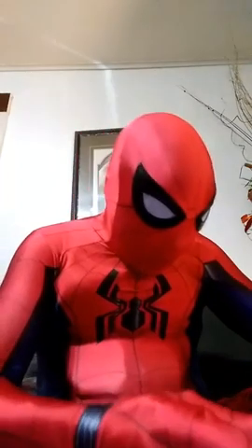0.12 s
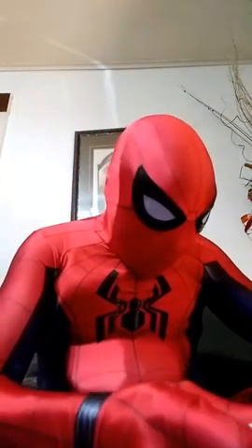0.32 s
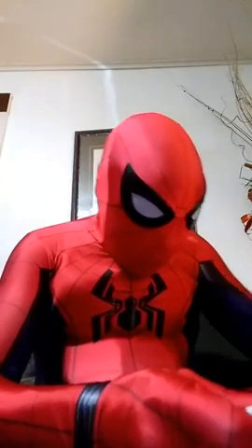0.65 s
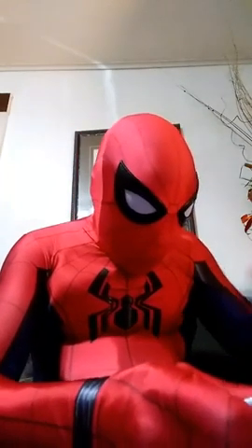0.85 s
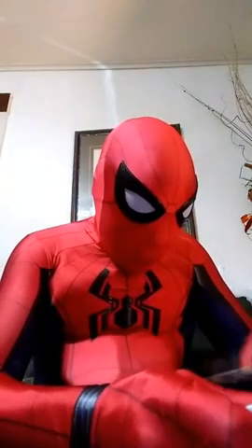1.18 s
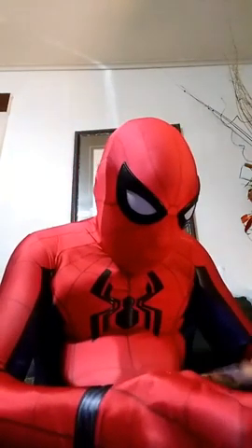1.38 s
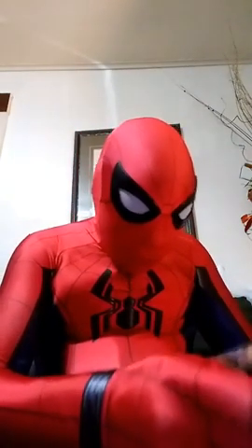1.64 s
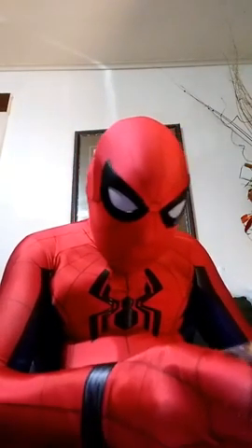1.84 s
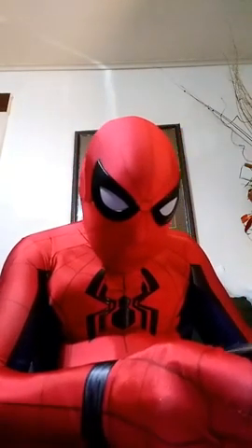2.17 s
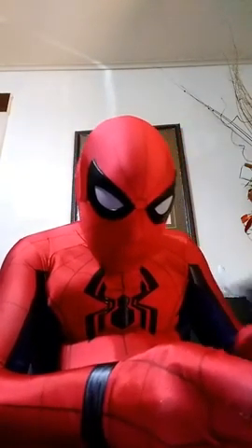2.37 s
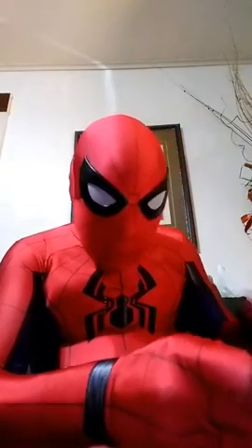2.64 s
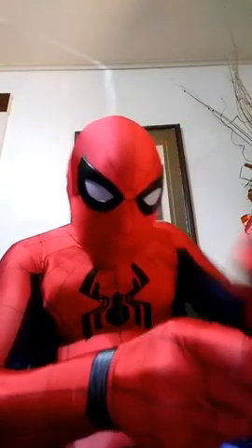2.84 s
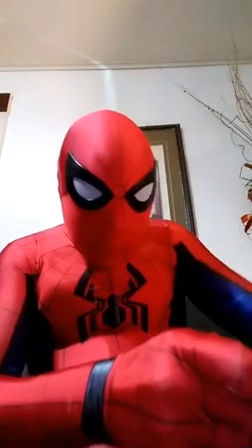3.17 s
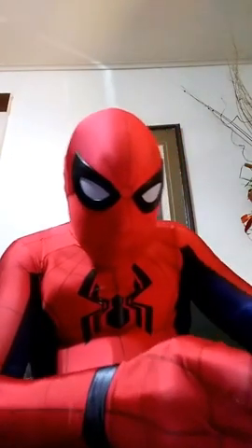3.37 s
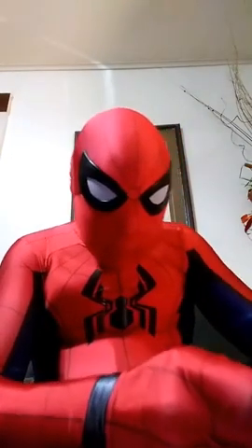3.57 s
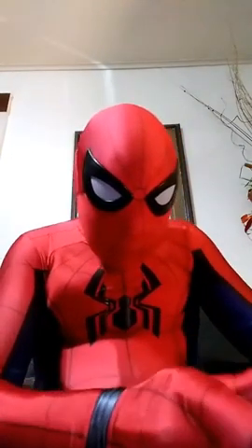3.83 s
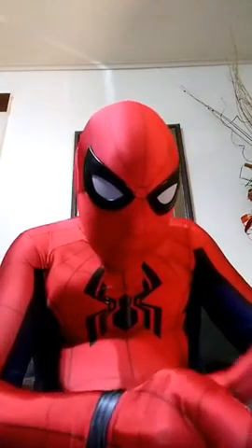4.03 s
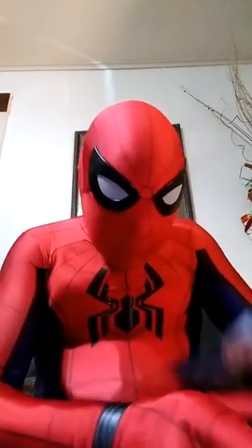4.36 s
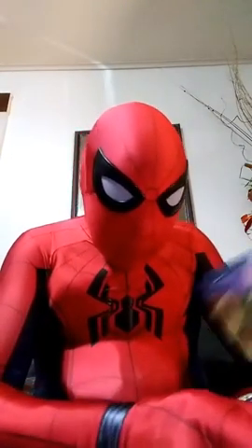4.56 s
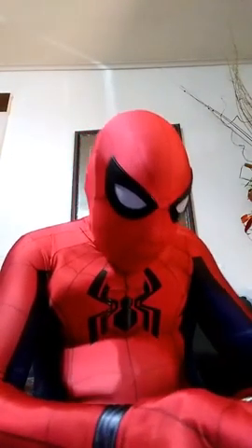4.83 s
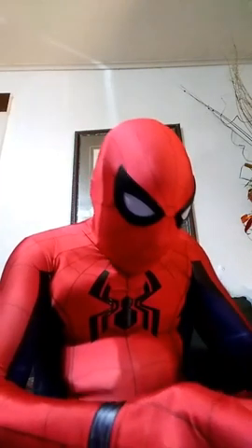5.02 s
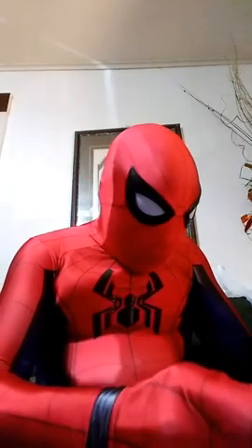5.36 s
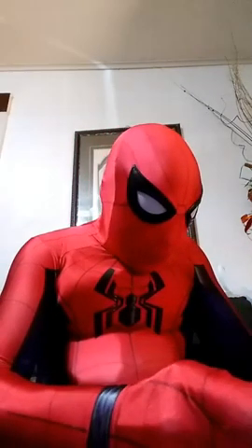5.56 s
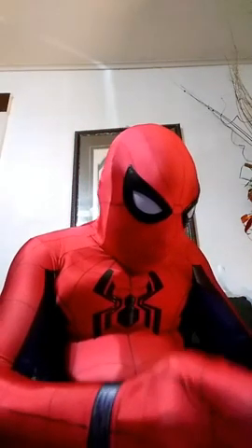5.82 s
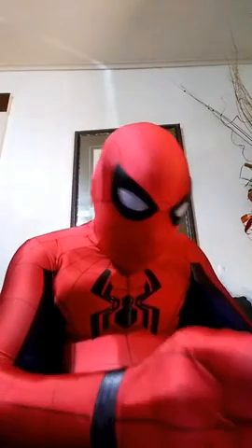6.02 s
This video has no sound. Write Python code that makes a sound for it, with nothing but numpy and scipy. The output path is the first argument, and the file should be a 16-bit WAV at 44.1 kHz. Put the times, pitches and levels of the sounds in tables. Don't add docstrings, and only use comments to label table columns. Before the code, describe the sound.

A quiet room, heard through a small close microphone whose faint hiss nearly vanishes between movements. A small paper jolt and snap come at once, then from 0.1 to 1.0 s pages scrape and crackle, with crisp snaps near 0.4 s and a stronger, duller papery snap at 0.85 s. Soft rubs and a hollow tap follow until 1.3 s. After a lull, light rustles at 1.6 and 1.9 s lead to a scraping turn with snaps and ticks from 2.0 to 2.4 s. Sparse small flicks continue to 3.2 s. A sharp crack at 3.3 s opens the busiest turn: grainy sliding, a hard snap at 4.08 s, a finger knock at 4.28 s, and crackles around 4.35 to 4.6 s, fading by 4.8 s. Tiny ticks dot the hush. From 5.6 to 6.0 s a soft, bright, airy page slide passes, with a barely audible very high whine, then a last faint rub at 6.1 s.

```python
import sys
import numpy as np
from scipy import signal
from scipy.fft import rfft, irfft, next_fast_len
from scipy.io import wavfile
from scipy.ndimage import uniform_filter1d

SR = 44100
rng = np.random.default_rng(int(sys.argv[2]) if len(sys.argv) > 2 else 0)


def gain_from_decibels(decibels):
    exponent = np.asarray(decibels, float) / 20
    return 10 ** exponent


def int16_out(signal):
    q = np.round(np.clip(np.atleast_2d(signal).T, -1, 1) * 32767)
    wavfile.write(sys.argv[1], SR, q.astype(np.int16))


N = 272449

# start in seconds, length in seconds, scrape in dB,
# brightness in dB, weight on the book in dB.
DRAGS = [(0.103, 0.091, -52.5, 0.5, 0), (0.253, 0.15, -46, 1, -7), (0.4, .07, -51, 1, -8),
         (0.47, 0.2, -46.5, -8, -7.5), (0.689, 0.052, -36.5, -9, -4), (0.905, 0.14, -53.5, -12, 3),
         (1.079, 0.17, -61, 3, 4), (1.591, 0.083, -51, -3.5, -13), (1.668, 0.082, -55, -5.5, -1),
         (1.895, 0.083, -58, -2.5, -5), (2.024, 0.25, -57.5, -1, 2.5), (2.092, 0.136, -42, -9.5, 0),
         (2.068, .03, -50, -3, -2), (2.231, .14, -41.5, -13.5, 1), (2.554, 0.082, -51, -13, -5),
         (4.063, 0.02, -32, -5, -6.5), (2.887, 0.064, -53, -9, -2), (3.279, 0.015, -57, -16, 2),
         (3.298, .01, -52, -8, -3), (3.402, 0.22, -51, 0, -2), (3.63, .31, -47, -3, -2),
         (3.938, 0.22, -42, -4, -5), (4.155, 0.22, -45.5, -5, -0.5), (4.346, 0.176, -42.5, -1, -9),
         (4.522, 0.056, -49, -4, -2), (4.578, 0.16, -45.5, -2, -7), (5.903, 0.1, -50, -8, -2),
         (5.573, .125, -57.5, 6.5, -4.5)]
# start in seconds, length in seconds, scrape in dB,
# brightness in dB, weight on the book in dB.
SWISHES = [(0.26, 0.14, -48.5, -2, -14), (0.482, 0.23, -41.5, -7, -28), (0.826, 0.06, -31, -40, -1),
           (1.862, 0.061, -52, -5.5, -1), (2.125, 0.1, -36.5, -14, -35), (3.022, 0.046, -55.5, -4.5, -2),
           (2.745, 0.039, -57.5, -5, -4), (3.158, 0.039, -55.5, -5, 6), (3.392, .15, -41, -2, -7),
           (3.759, 0.15, -47, -2.5, -8), (4.028, 0.1, -36.5, -5, -8), (4.173, 0.051, -43.5, -2, -12),
           (4.47, 0.078, -42.5, -9, -14), (4.913, 0.082, -53, -17, -2.5), (5.621, 0.036, -50, 3, 3),
           (5.634, 0.27, -46.5, 4.5, -3), (5.741, 0.2, -48, 6.5, 0), (6.118, 0.09, -48.5, -5, -1.5),
           (0.95, 0.092, -59, 5.5, 6), (3.591, 0.07, -51, -2, -1.5)]
# start in seconds, length in seconds, scrape in dB,
# brightness in dB, weight on the book in dB.
JOLTS = [(0.029, 0.05, -45, -1.5, -3), (0.202, 0.13, -51, -8, -6.5), (0.742, 0.093, -41.5, -10, -1),
         (0.824, 0.033, -33.5, -26, -3), (0.865, 0.11, -35, -33, 3.5), (1.885, 0.09, -47, -16, 9),
         (1.091, 0.2, -48, -32, -2), (1.22, 0.074, -55, -23, 10), (1.604, 0.074, -52.5, 3, 6),
         (2.36, 0.083, -47, -6, 1), (2.562, 0.015, -46, -10, -15), (3.3074, .03, -24.5, -2, -7.5),
         (3.315, 0.09, -36.5, -4, -7.5), (4.339, 0.14, -38.5, -2, -3.5), (4.672, 0.09, -50, -12, 7),
         (4.585, .03, -44, -1, -11), (4.72, 0.085, -47.5, -1.5, -2)]
# start in seconds, length in seconds, rumble in dB.
BUMPS = [(0.24, 0.21, -56), (0.624, 0.087, -43.5), (0.7, .11, -45), (0.83, 0.064, -49), (0.911, .1, -43),
         (1.06, 0.16, -48.5), (1.218, 0.084, -49.5), (1.606, 0.078, -50), (1.871, 0.1, -44),
         (2.09, 0.31, -51.5), (2.26, 0.15, -46.5), (2.536, 0.088, -51), (3.306, 0.032, -34.5),
         (3.376, 0.083, -51), (3.656, 0.062, -47.5), (4.066, 0.14, -46.5), (4.12, 0.15, -45.5),
         (4.263, 0.051, -40.5), (4.676, 0.13, -49), (5.643, 0.17, -55.5), (6.132, 0.043, -54)]
# centre in Hz, width in Hz, level in dB.
LOW_RINGS = [(1212, 510, -7), (1313, 670, 0), (1610, 350, -1), (1976, 570, 3)]
# centre in Hz, width in Hz, level in dB.
HIGH_RINGS = [(2810, 970, 3), (3290, 680, -0.5), (3970, 820, -0.5), (4336, 1100, -7)]
# centre in Hz, width in Hz, level in dB.
HOLLOW = [(620, 145, 1.5), (485, 410, -4), (820, 680, -11.5)]
# centre in Hz, width in Hz, lift in dB.
CAVITIES = [(361, 30, 0), (883, 25, -0.5), (1092, 25, -2.5), (1590, 27, -5.5), (1955, 34, -6.5),
            (2150, 34, -6), (3046, 42, -5.5)]
# frequency in Hz, level in dB.
SURFACE_SPECTRUM = [(800, -20.5), (3000, -11), (5000, 1), (7000, -3), (10000, -10.5), (14000, -21.5)]
# frequency in Hz, level in dB.
RUMBLE_SPECTRUM = [(25, -34), (55, 3), (120, 0), (300, -2.5), (450, -5.5), (900, -24.5), (2000, -54)]
# opening in seconds, closing in seconds.
GATE_SPANS = [(0.026, 0.083), (0.103, 1.049), (1.077, 1.292), (1.597, 1.756), (1.862, 1.987),
              (2.022, 2.428), (2.553, 2.639), (2.752, 2.779), (2.89, 2.95), (3.024, 3.059), (3.163, 3.194),
              (3.279, 4.791), (4.916, 4.987), (5.573, 6.018), (6.128, 6.2)]
# start in seconds, length in seconds,
# first pitch in Hz, last pitch in Hz, level in dB.
ARCHES = [(0.25, 0.19, 3100, 3120, -48.5), (0.53, 0.12, 3080, 2930, -42.5),
          (1.596, 0.062, 3080, 2670, -47.5), (2.17, 0.06, 4500, 4500, -49),
          (2.238, 0.17, 4520, 4330, -48.5), (2.3, .07, 3100, 2800, -44), (2.165, .05, 1710, 1570, -41),
          (0.466, 0.057, 3250, 2900, -40.5), (.495, .1, 2050, 1860, -45), (.285, 0.025, 3300, 3300, -46),
          (4.94, 0.043, 1210, 1070, -56.5), (2.56, .05, 1900, 1850, -50), (2.86, .09, 1950, 1950, -62),
          (4.193, 0.031, 2960, 2680, -44), (4.396, 0.026, 3250, 3000, -40.5),
          (4.58, 0.032, 1650, 1480, -45), (4.062, 0.027, 2080, 2150, -32.5),
          (4.09, 0.037, 4100, 3760, -40.5), (2.09, .07, 3040, 3070, -43.5),
          (1.095, 0.065, 1150, 1190, -49.5), (1.086, .14, 3860, 4270, -60.5),
          (3.298, 0.82, 2170, 1940, -59.5), (0.5, 0.06, 1500, 1600, -46), (5.592, 0.048, 5400, 5550, -51)]
# start in seconds, length in seconds,
# first pitch in Hz, last pitch in Hz, level in dB.
BILLOWS = [(0.824, 0.06, 1560, 1166, -26), (5.662, 0.27, 4400, 4400, -45), (0.428, 0.045, 3300, 2900, -40),
           (0.43, .08, 4700, 3600, -42), (2.241, 0.077, 3560, 3070, -39.5),
           (0.832, 0.039, 3000, 2700, -41.5), (0.69, 0.054, 1600, 1260, -35.5),
           (0.69, .05, 4100, 2800, -40.5), (4.035, .1, 5400, 5000, -42.5), (5.76, .14, 6300, 6700, -50),
           (0.845, 0.05, 620, 560, -31), (.86, .03, 350, 320, -36), (4.035, .03, 1900, 2000, -39),
           (0.68, 0.067, 1040, 1060, -43)]
# start in seconds, length in seconds, first pitch in Hz,
# last pitch in Hz, level in dB.
STIRS = [
    (5.44, 0.25, 4000, 4800, -71.5),
    (6.027, 0.083, 3500, 3500, -65),
]
# start in seconds, peak in dB, centre in Hz, 60 dB decay in seconds.
SNAPS = [(0.031, -32, 1700, 0.037), (0.2573, -25, 3220, 0.031), (0.389, -19.5, 3020, 0.05),
         (0.432, -17, 3300, 0.06), (0.4887, -22, 3050, 0.03), (0.692, -36, 1830, 0.03),
         (1.9425, -56, 1660, 0.03), (2.106, -24, 1920, 0.08), (2.1294, -38, 1900, 0.03),
         (2.285, -35, 3340, 0.03), (3.171, -30, 2170, 0.032), (3.309, -12, 3300, 0.02),
         (3.3128, -9, 2100, 0.025), (3.3212, -10.5, 2170, 0.047), (3.9914, -19.5, 1610, 0.012),
         (4.0755, -10, 2090, 0.011), (4.082, -6, 2200, 0.022), (4.342, -23, 2440, 0.03),
         (4.358, -13.5, 1860, 0.061), (4.403, -17, 3140, 0.096), (4.515, -22, 1710, 0.053),
         (4.5848, -25.5, 1700, 0.027), (0.8423, -8.5, 1470, 0.026), (0.853, -6, 1490, 0.017),
         (2.2405, -24, 1700, .04), (2.347, -25, 1600, .03), (2.318, -22, 1500, .04),
         (0.5035, -23, 1900, .04), (3.411, -26, 2150, .04)]
# start in seconds, peak in dB, centre in Hz.
TICKS = [(0.2064, -27, 5200), (0.2066, -33, 2500), (0.4344, -36, 2900), (0.6178, -29, 5000),
         (1.227, -44, 5900), (2.1306, -21, 2800), (2.2214, -47, 3000), (2.358, -27.5, 2600),
         (1.9424, -37, 3400), (2.5644, -25, 4200), (3.3082, -13, 3400), (3.3084, -23, 6000),
         (3.3225, -17.5, 5800), (3.9535, -27, 5500), (3.9535, -30, 2100), (4.3424, -21, 3000),
         (4.3426, -27, 6500), (4.143, -32, 5500), (3.4547, -33, 2200), (3.497, -29, 2800),
         (3.633, -35, 5800), (4.0464, -28, 2400), (4.702, -36, 3200), (4.735, -38, 3100),
         (4.518, -33, 4000), (2.2855, -25, 3000), (5.423, -57, 3000)]
# start in seconds, peak in dB, pitch in Hz, 60 dB decay in seconds.
TAPS = [(0.107, -45, 603, 0.039), (0.649, -30, 105, 0.037), (0.691, -26, 684, 0.051),
        (0.779, -36, 650, 0.05), (1.105, -34.5, 524, 0.059), (1.22, -41, 684, 0.049),
        (1.889, -38, 592, 0.044), (1.901, -52, 600, 0.039), (2.104, -38, 640, 0.11),
        (2.129, -28, 630, 0.02), (2.564, -38, 92, 0.024), (2.764, -45, 616, 0.048),
        (3.134, -50.5, 517, 0.2), (2.57, -48, 560, .15), (3.172, -46, 625, 0.042),
        (3.31, -27.5, 670, 0.067), (4.163, -40, 192, 0.038), (4.274, -31, 121, 0.089),
        (4.292, -37, 616, 0.06), (4.672, -50, 600, 0.037), (4.931, -52, 562, 0.11)]
# centre in seconds, peak in dB, pitch in Hz, length in seconds.
KNOCKS = [(4.2785, -19, 611, .015), (4.2885, -29, 620, .012), (4.169, -32, 190, 0.0244),
          (4.279, -30, 385, .02), (3.315, -31, 150, .02), (3.313, -30, 230, .012), (4.222, -35, 2850, .006),
          (4.208, -39, 2600, 0.0065), (5.283, -52, 620, .012), (5.131, -54, 600, 0.0116),
          (5.024, -57, 560, .01)]
# time in seconds, leak in dB.
LEAK_LEVELS = [(0.0, -75), (0.017, -63), (1.29, -65), (1.305, -75), (1.48, -70), (1.5, -64.5), (1.585, -61),
               (1.81, -66), (2.44, -65.5), (2.54, -68), (2.65, -65.5), (2.875, -60.5), (2.975, -65),
               (3.25, -71), (4.9, -66), (5.4, -72), (5.565, -67), (6.03, -62)]
# start in seconds, peak in dB, length in seconds.
FLICKS = [(1.518, -58, 0.0076), (1.529, -46, 0.0088), (1.539, -43, 0.012), (1.555, -53, 0.0092),
          (1.841, -47, 0.005), (2.005, -45, 0.013), (2.482, -53, 0.0056), (2.498, -65, 0.0043),
          (2.669, -63, 0.0058), (2.69, -46, 0.0033), (2.713, -44, 0.0058), (2.729, -46, 0.016),
          (2.8, -51, 0.0046), (2.815, -42.5, 0.0079), (2.876, -46, 0.006), (3.09, -55, 0.007),
          (3.116, -56, 0.0042), (3.142, -48, .025), (2.958, -42, .01), (2.865, -45, .02),
          (4.832, -47, 0.0075), (5.019, -46, 0.011), (5.129, -41.5, 0.0072), (5.133, -51, 0.025),
          (5.241, -45.5, 0.003), (5.265, -49.5, 0.0075), (5.281, -40.5, 0.0076), (5.312, -39, 0.011),
          (6.062, -60, 0.01), (6.077, -53, 0.013)]
# frequency in Hz, level in dB.
LEAK_SPECTRUM = [(25, -29), (55, 0), (170, -2), (400, -9), (620, -5.5), (950, -14.5), (2080, -9.5),
                 (2800, -12.5), (7400, -24), (14000, -29.5)]
# frequency in Hz, level in dB.
MIC_SPECTRUM = [(500, -10), (4000, -0.5), (14000, -3)]
# start in seconds, pitch in Hz, level in dB.
WHINE = (5.605, 13310, -73)

EDGE_S, DRAG_SAG_DB = 0.006, 2.5
SWISH_ENDS_DB = -18
JOLT_RISE_S, JOLT_FALL_DB, JOLT_BEND = 0.0035, -20, 1.3
STIFF_DB, STIFF_PER_BRIGHT = 0.5, 0.49
SUPPORT_DB, SUPPORT_PER_WEIGHT = -4.5, 0.62
ARCH_WIDTH, BILLOW_WIDTH, STIR_WIDTH = 0.1, 0.23, 0.9
TICK_TOP = 1.9
MIC_HISS_DB = -64
LOW_CUT_HZ, HIGH_CUT_HZ = 33, 14300


def strokes():
    low, high, hollow, hiss, support = efforts()
    gate = open_gate()
    sheet = low * rings(LOW_RINGS, patchy_db=2.5) + high * rings(HIGH_RINGS, patchy_db=2.0)
    surface = coloured(rub(), SURFACE_SPECTRUM) + gain_from_decibels(-9) * ring(6360, 750, patchy_db=-3.0)
    rumble = evened(coloured(rub(), RUMBLE_SPECTRUM) * gain_from_decibels(1.5 * lumps(0.0049)))
    paper = sheet + hollow * rings(HOLLOW, patchy_db=1.2) + gain_from_decibels(-3.0) * hiss * surface
    judder = gain_from_decibels(0.5 * lumps(0.0021))
    gated = gate * (cavities(judder * paper) + support * rumble + mic_hiss())
    return gated + (0.28 + 0.7 * gate) * whine()


def efforts():
    power, t = np.zeros((5, N)), np.arange(N) / SR
    for shape, rows in ((drag, DRAGS), (swish, SWISHES), (jolt, JOLTS)):
        for s, length, db, bright_db, weight_db in rows:
            first = max(round((s - length) * SR), 0)
            near = slice(first, round((s + 2 * length + EDGE_S) * SR))
            stiff_db = STIFF_DB + STIFF_PER_BRIGHT * bright_db
            support_db = SUPPORT_DB + SUPPORT_PER_WEIGHT * weight_db
            shares_db = np.array([0, stiff_db, weight_db, bright_db, support_db])
            power[:, near] += gain_from_decibels(db + shares_db)[:, None] ** 2 * shape(t[near] - s, length)
    for s, length, db in BUMPS:
        t_bump = np.arange(-length / 2, 2 * length, 1 / SR)
        add(power[-1], s - length / 2, gain_from_decibels(2 * db) * swish(t_bump, length))
    return np.sqrt(power)


def drag(t, length):
    edges = np.clip(np.minimum(t, length + EDGE_S - t) / EDGE_S, 0, 1)
    return (edges * gain_from_decibels(-DRAG_SAG_DB * t / length)) ** 2


def swish(t, length):
    return gain_from_decibels(2 * SWISH_ENDS_DB * (2 * t / length - 1) ** 2)


def jolt(t, length):
    rise = np.clip(t / JOLT_RISE_S, 0, 1)
    return (rise * gain_from_decibels(JOLT_FALL_DB * (abs(t) / length) ** JOLT_BEND)) ** 2


def rub():
    return friction(per_s=1200, spread_db=3.0, grain_db=-12.0, clump_db=1.41)


def friction(per_s, spread_db, grain_db, clump_db):
    size = gain_from_decibels(spread_db * np.minimum(rng.exponential(1, N), 4)) * rng.choice([-1, 1], N)
    grains = evened(size * (rng.random(N) < per_s / SR))
    scrape = rng.standard_normal(N) + gain_from_decibels(grain_db) * grains
    return evened(scrape * gain_from_decibels(clump_db * lumps(0.0073)))


def rings(modes, patchy_db):
    return evened(sum(gain_from_decibels(db) * ring(hz, width, patchy_db) for hz, width, db in modes))


def ring(hz, width, patchy_db):
    hz = hz * (1 + 0.025 * lumps(0.05))
    once = resonate(rub(), hz, width)
    twice = resonate(once, hz, width)
    steep = resonate(twice, hz, 2.5 * width)
    return evened(steep * gain_from_decibels(patchy_db * lumps(0.046)))


def cavities(x):
    size = next_fast_len(len(x))
    f = np.fft.rfftfreq(size, 1 / SR)
    gain = 1 + sum(gain_from_decibels(db) / (1 + 2j * (f - hz) / width) for hz, width, db in CAVITIES)
    return irfft(rfft(x, size) * gain, size)[:len(x)]


def open_gate():
    t = np.arange(N) / SR
    is_open = sum((t >= start) & (t < end) for start, end in GATE_SPANS)
    return uniform_filter1d(1.0 * is_open, size=200)


def arches():
    out, scrape = np.zeros(N), rub()
    for share, rows in ((ARCH_WIDTH, ARCHES), (BILLOW_WIDTH, BILLOWS), (STIR_WIDTH, STIRS)):
        for start, length, from_hz, to_hz, db in rows:
            x = scrape[round(start * SR):round((start + length) * SR)]
            hz, width = np.linspace(from_hz, to_hz, len(x)), share * from_hz
            glide = evened(resonate(resonate(x, hz, width), hz, width))
            add(out, start, gain_from_decibels(db) * glide * signal.windows.tukey(len(x), 0.4))
    return out


def snaps():
    out = np.zeros(N)
    for s, db, hz, t60 in SNAPS:
        add(out, s, burst(rng.standard_normal(4000), db - 10.5, hz, 1.03, t60))
    for s, db, hz in TICKS:
        add(out, s + 0.001, burst(rng.standard_normal(1000), db, hz, 0.8, 0.006))
    return out


def burst(puff, db, hz, spread, t60):
    kick = puff * gain_from_decibels(-60 * np.arange(len(puff)) / SR / max(t60, 0.002))
    crack = resonate(resonate(kick, hz, spread * hz), hz, spread * hz)
    dull = signal.butter(4, min(TICK_TOP * hz, SR / 3), fs=SR, output="sos")
    crack = signal.sosfilt(dull, crack)
    return gain_from_decibels(db) * crack / abs(crack).max()


def taps():
    out, t = np.zeros(N), np.arange(8000) / SR
    for s, db, hz, t60 in TAPS:
        knock = np.sin(2 * np.pi * hz * t) + 0.18 * np.sin(2 * np.pi * 0.84 * hz * t)
        knock *= (1 - np.exp(-t / 0.0012)) * gain_from_decibels(-60 * t / max(t60, 0.01))
        add(out, s, gain_from_decibels(db) * knock / abs(knock).max())
    return out


def knocks():
    out = np.zeros(N)
    for s, db, hz, length in KNOCKS:
        t = np.arange(0, length, 1 / SR)
        add(out, s - length / 2, gain_from_decibels(db) * np.hanning(len(t)) * np.sin(2 * np.pi * hz * t))
    return out


def lulls():
    leak_db = np.interp(np.arange(N) / SR, *np.transpose(LEAK_LEVELS))
    gain = gain_from_decibels(leak_db + 0.47 * lumps(0.0036))
    for s, peak_db, length in FLICKS:
        flick = np.hanning(max(round(1.6 * length * SR), 8))
        add(gain, s - 0.003, gain_from_decibels(peak_db - 15.5) * flick)
    return gain * coloured(rng.standard_normal(N), LEAK_SPECTRUM)


def mic_hiss():
    return gain_from_decibels(MIC_HISS_DB) * coloured(rng.standard_normal(N), MIC_SPECTRUM)


def whine():
    start, hz, db = WHINE
    t = np.arange(N) / SR
    return gain_from_decibels(db) * (t > start) * np.sin(2 * np.pi * hz * t)


def resonate(x, hz, width):
    turn = np.exp(2j * np.pi * np.cumsum(hz * np.ones(len(x))) / SR)
    r = np.exp(-np.pi * width / SR)
    return 2 * (turn * signal.lfilter([1 - r], [1, -r], x * turn.conj())).real


def coloured(x, points):
    hz, db = np.transpose(points)
    size = next_fast_len(len(x))
    gain = gain_from_decibels(np.interp(np.log(np.fft.rfftfreq(size, 1 / SR) + 1), np.log(hz), db))
    return evened(irfft(rfft(x, size) * gain, size)[:len(x)])


def lumps(seconds):
    size = max(round(seconds * SR), 2)
    smooth = uniform_filter1d(rng.standard_normal(N), size)
    return evened(uniform_filter1d(smooth, size))


def evened(x):
    return x / np.sqrt(np.mean(x ** 2) + 1e-20)


def add(mix, s, sound):
    part = mix[round(s * SR):][:len(sound)]
    part += sound[:len(part)]


def scene():
    return np.tile(strokes() + arches() + snaps() + taps() + knocks() + lulls(), (2, 1))


def roll_off(x):
    return signal.sosfilt(signal.butter(12, 15590, fs=SR, output="sos"), x)


def record(dry):
    low_cut = signal.butter(2, LOW_CUT_HZ, "high", fs=SR, output="sos")
    high_cut = signal.firwin(401, HIGH_CUT_HZ, window=("kaiser", 6), fs=SR)
    mix = signal.oaconvolve(signal.sosfilt(low_cut, dry), high_cut[None], "same")
    return roll_off(mix)


dry = scene()
out = record(dry)
int16_out(out)
```